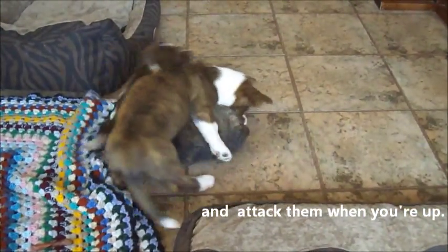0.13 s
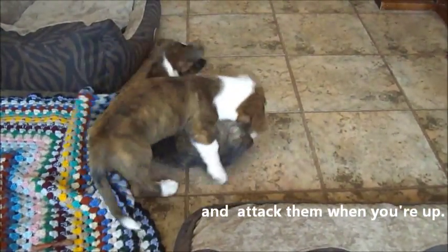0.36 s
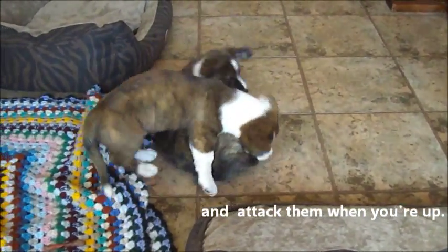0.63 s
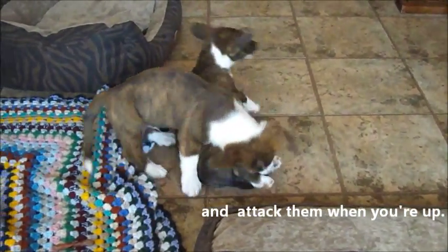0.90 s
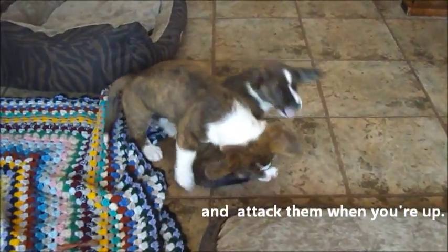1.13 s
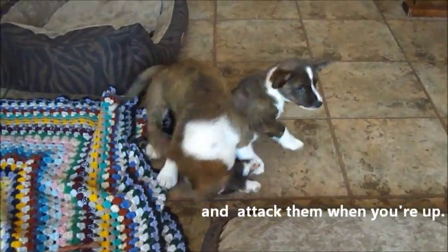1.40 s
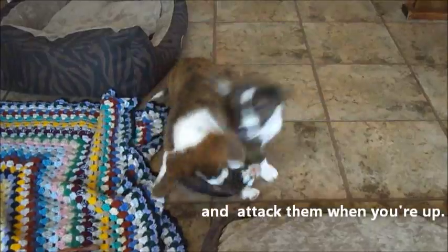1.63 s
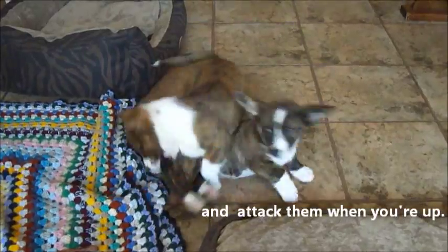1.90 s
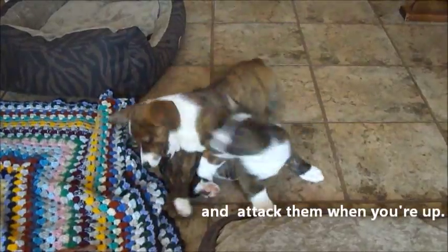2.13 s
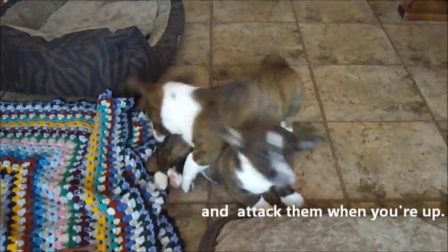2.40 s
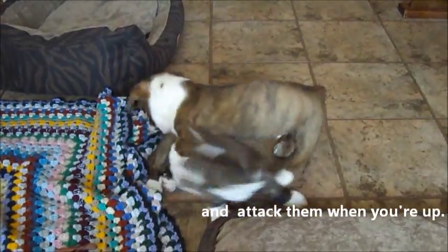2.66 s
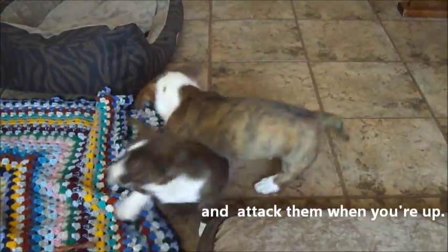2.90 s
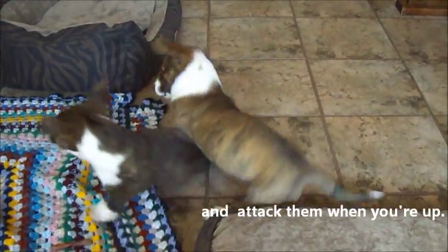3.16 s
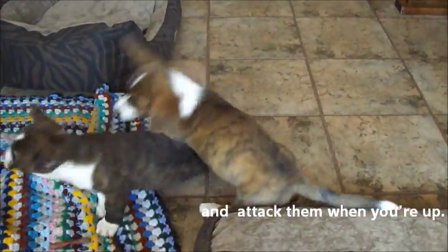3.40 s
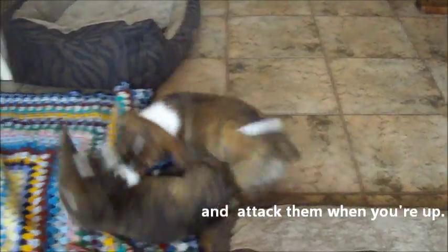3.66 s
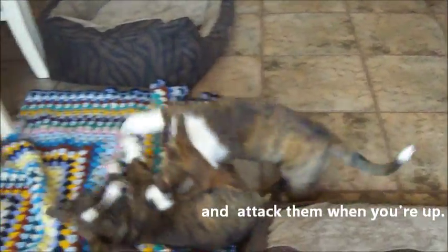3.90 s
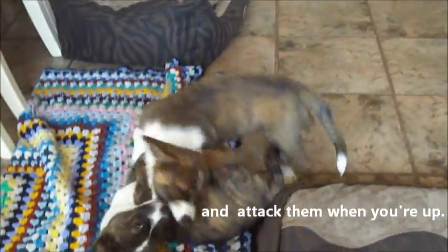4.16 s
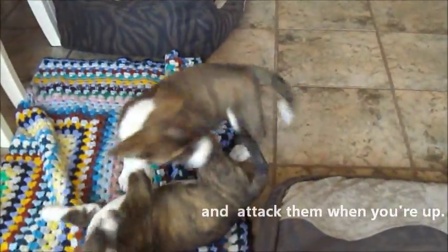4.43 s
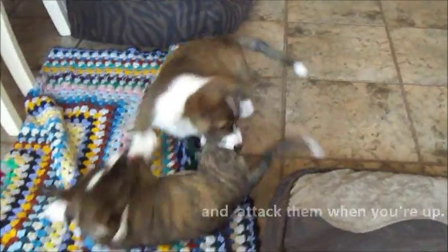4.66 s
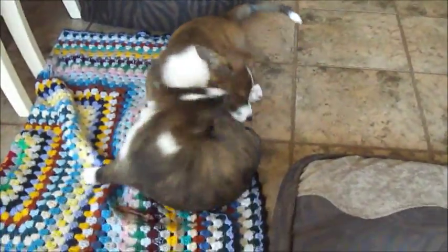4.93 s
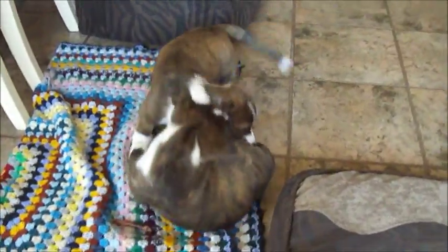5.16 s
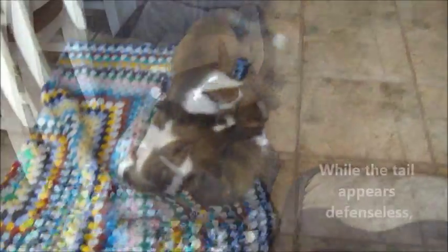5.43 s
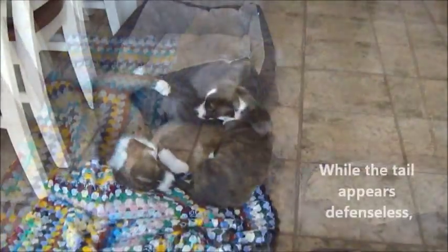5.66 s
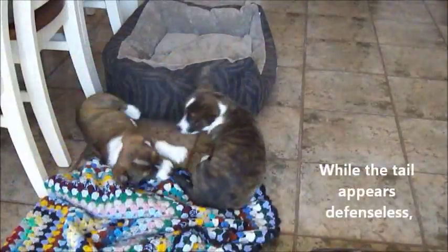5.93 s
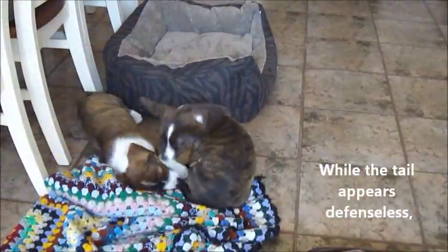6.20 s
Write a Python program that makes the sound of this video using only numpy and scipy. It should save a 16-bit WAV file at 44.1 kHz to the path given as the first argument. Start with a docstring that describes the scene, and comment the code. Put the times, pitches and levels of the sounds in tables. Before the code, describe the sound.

In a small hard tiled room, a puppy growls in short raspy bursts, four in the first two and a half seconds, then a lull with scuffling and a faint low growl. Two strong growls follow around four seconds, a weaker one at five, and a brief one with a thump near six. Fur rustles throughout, claws tick, paws skid. A small thin-bassed microphone is close by.

```python
"""A small hard room with a blanket and a tiled floor, where two puppies wrestle.
One growls in short bursts: uneven vocal-fold pulses and breath through a moving throat and mouth.
At times its folds lock into a clear hum, or slap hard once and ring the throat; the nose sniffs.
Fur and wool rustle all along as shaped noise; claws and teeth tick and bodies thump as dying rings.
Paws skid as gritty noise bursts. A faint low drone lies beneath, and the room rings on."""
import sys
import numpy as np
from scipy import signal
from scipy.fft import rfft, irfft, next_fast_len
from scipy.io import wavfile
from scipy.ndimage import uniform_filter1d

SR = 44100
rng = np.random.default_rng(int(sys.argv[2]) if len(sys.argv) > 2 else 0)


def file_out(sig):
    """Save sig as 16-bit WAV at sys.argv[1]."""
    # one column per channel
    cols = np.atleast_2d(sig).T
    # limit, then scale
    lim = np.clip(cols, -1, 1)
    pcm = np.round(lim * 32767).astype(np.int16)
    wavfile.write(sys.argv[1], SR, pcm)


def rack_gain(trim_db):
    """Turn a fader trim in dB into the linear factor to multiply a signal by."""
    fader = np.asarray(trim_db, float)
    return 10 ** (fader / 20)


N = 278077  # samples

# rustle of fur and wool over the room hush: (time [s], level above 2 kHz [dB])
RUSTLE_LEVEL = [(0.0, -51.5), (0.88, -51.5), (1.79, -52), (2.75, -53), (2.88, -50.5), (3.75, -52.5),
                (3.93, -54.5), (4.23, -56.5), (4.42, -54), (5.28, -60), (5.421, -63), (5.54, -63.5),
                (5.67, -58.5), (5.86, -53), (6.02, -52.5), (6.3, -53.5)]


def rms_one(x):
    """Scale to rms 1."""
    return x / np.sqrt(np.mean(x ** 2) + 1e-20)


def evened(x, seconds):
    """Divide by the running rms."""
    return x / np.sqrt(uniform_filter1d(x ** 2, int(seconds * SR)) + 1e-12)


def add(out, s, sound):
    """Mix a short sound in at s seconds."""
    i = int(round(s * SR))
    out[i:i + len(sound)] += sound[:N - i]


def in_time(rows):
    """The samples a table spans, and its columns as curves over them."""
    s, *columns = np.transpose(rows)
    span = slice(int(s[0] * SR), int(s[-1] * SR))
    now = np.arange(span.start, span.stop) / SR
    return span, [np.interp(now, s, column) for column in columns]


def drift(rate, count=N):
    """Slow chance: white noise twice through a one-pole low-pass at rate Hz; rms 1."""
    r = np.exp(-2 * np.pi * rate / SR)
    white = rng.standard_normal(count + 8000)
    slow = signal.lfilter([1], [1, -2 * r, r * r], white)
    return rms_one(slow[8000:])  # the filter has settled by then


def resonance(x, hz, width_hz):
    """Two-pole resonance, gain 1 on top; the centre may move from block to block."""
    r = np.exp(-np.pi * width_hz / SR)
    hz = np.broadcast_to(hz, x.shape)
    out, state = np.zeros(len(x)), np.zeros(2)
    step = 512 if hz.strides[0] else len(x)  # a fixed centre needs one block only
    zeros = [(1 - r * r) / 2, 0, (r * r - 1) / 2]
    for i in range(0, len(x), step):
        poles = [1, -2 * r * np.cos(2 * np.pi * hz[i] / SR), r * r]
        out[i:i + step], state = signal.lfilter(zeros, poles, x[i:i + step], zi=state)
    return out


def cavity(x, hz, first_width_hz, second_width_hz):
    """Two resonances in a row on one centre: steeper skirts than one."""
    return resonance(resonance(x, hz, first_width_hz), hz, second_width_hz)


def dying(t60, length):
    """Exponential fall from 1 over length seconds, 60 dB in t60 seconds."""
    return rack_gain(-60 * np.arange(int(length * SR)) / SR / t60)


def struck(hz, t60):
    """A dying sine that swells over its first cycle."""
    fall = dying(t60, t60) - dying(2 / hz, t60)
    return np.sin(2 * np.pi * hz * np.arange(len(fall)) / SR) * fall


def rings(rows, cycles):
    """Rows of (s, dB, Hz): each blow rings for a number of cycles."""
    out = np.zeros(N)
    for s, db, hz in rows:
        add(out, s, rack_gain(db) * struck(hz, cycles / hz))
    return out


def swell(length, peak_at):
    """A smooth rise to 1 and fall to 0; peak_at is the share of the length spent rising."""
    place = np.linspace(0, 1, int(length * SR))
    return np.sin(np.pi * np.interp(place, [0, np.clip(peak_at, .05, .95), 1], [0, .5, 1]))


def drone():
    """A faint narrow low band of noise that sinks and rises with the hush."""
    start_db, follows = -67, 0.75  # follows: share of the hush's swings
    swing_db = np.interp(np.arange(N) / SR, *np.transpose(RUSTLE_LEVEL)) - RUSTLE_LEVEL[0][1]
    hum_noise = rms_one(resonance(rng.standard_normal(N), 145.5, 9.4))
    return rack_gain(start_db + follows * swing_db) * hum_noise


def rustle(patchy_db=1, grain_db=0.5):
    """Fur on wool: narrow bands of grainy noise, each flickering a little; harder rubbing is brighter."""
    # spectrum of the rubbing before its tilt: (frequency [Hz], relative density [dB per Hz])
    rub_colour = [(15, -58), (25, -7.5), (113, -16), (142, -13.5), (174, -11), (213, -4), (337, -1),
                  (413, -5.5), (638, -5), (1640, -9.5), (2400, -12.5), (4780, -13.5), (10000, -22),
                  (11100, -27), (14400, -57), (22000, -120)]
    level_db = np.interp(np.arange(N) / SR, *np.transpose(RUSTLE_LEVEL))
    # dB per octave at mean level, and its rise per dB of level
    tilt_db = -0.78 + 0.02 * (level_db - level_db.mean())
    colour_hz, colour_db = np.transpose(rub_colour)
    edges = 22 * 2 ** np.arange(0, 9.3, .4)
    together = drift(9)
    white = rng.standard_normal((2, N)) * rack_gain(grain_db * drift(100))
    knots = np.arange(0, N, 2000)
    out, treble_power = 0, 0
    for k, (low, high) in enumerate(zip(edges, edges[1:])):
        sos = signal.butter(2, [low, high], "band", fs=SR, output="sos")
        band = signal.sosfilt(sos, white[k % 2])  # neighbours use separate noises
        hz = min(np.sqrt(low * high), 10000)  # the colour stays level above 10 kHz
        band = band * rack_gain(np.interp(np.log(hz), np.log(colour_hz), colour_db))
        treble_power = treble_power + (hz > 2000) * np.mean(band ** 2)
        flicker = np.interp(np.arange(N), knots, rng.standard_normal(len(knots)))
        out = out + band * rack_gain(tilt_db * np.log2(hz / 4000) + patchy_db * (together + flicker))
    return rack_gain(level_db) * out / np.sqrt(treble_power)


def skids():
    """Pads and claws slide: a broad gritty burst; longer slides set in more gently."""
    # paws skidding: (time [s], level [dB], t60 [s])
    slides = [(0.796, -41, 0.058), (2.06, -47, 0.06), (2.42, -45, 0.26), (2.868, -32.5, 0.11),
              (2.884, -45.5, 0.29), (3.3, -42, 0.28), (3.569, -44.5, 0.33), (3.68, -50, 0.31),
              (3.881, -41, 0.058), (4.68, -46, 0.44), (5.27, -52.5, 0.37), (5.701, -46, 0.079),
              (5.92, -46, 0.35), (6.12, -48, 0.17)]
    grit = rng.standard_normal(N) * rack_gain(4.0 * drift(330))
    grit = signal.sosfilt(signal.butter(1, [250, 4500], "band", fs=SR, output="sos"), grit)
    level = np.zeros(N)
    for s, db, t60 in slides:
        onset = 1 - dying(t60 / 3, t60)
        add(level, s, rack_gain(db) * dying(t60, t60) * onset)
    return rms_one(grit) * level


def thumps():
    """A soft body on a hard floor: a low ring."""
    # bodies landing: (time [s], level [dB], ring [Hz])
    landings = [(.9, -31.5, 505), (3.884, -37.5, 136), (5.94, -23.5, 235), (6.5, -36.5, 130),
                (5.94, -42, 83)]
    return rings(landings, 11.7)


def ticks(cycles=10.0):
    """A hard point on tile rings the modes near its brightest pitch; a dry crack covers the same range."""
    # claws and teeth: (time [s], level [dB], brightest [Hz], spread [octaves])
    taps = [(0.9655, -34, 3770, 0.35), (0.967, -29.5, 1330, 0.19), (1.1989, -30.5, 4900, 0.21),
            (1.2428, -30, 1980, 0.24), (2.881, -38, 3470, 1), (3.008, -40, 3300, .25),
            (1.2897, -38, 4120, 0.27), (1.849, -33, 5400, 0.82), (2.5136, -37, 4300, 0.34),
            (3.5015, -31, 1600, 0.15), (3.881, -24.5, 1040, 0.46), (3.882, -37, 3000, 0.85),
            (4.294, -35, 4050, 0.46), (4.373, -31.5, 1850, 0.36), (4.4701, -38, 4080, 0.75),
            (4.471, -39, 1880, .2), (4.501, -34, 3000, 0.39), (4.504, -27, 1440, 0.15),
            (4.51, -31, 1430, 0.23), (5.12, -31, 2100, 0.19), (5.1215, -34, 3320, 0.36),
            (5.471, -41, 1170, 0.23), (5.658, -42, 1840, 0.24), (5.693, -48, 5000, 1.3)]
    # rings of claw, tooth and tile: frequency [Hz]
    modes_hz = [850, 1150, 1380, 1660, 1880, 2420, 3300, 4150, 4950, 5600, 7300]
    out = np.zeros(N)
    grit = rng.standard_normal((len(taps), SR // 20))
    luck = rng.standard_normal((len(taps), len(modes_hz)))
    for (s, db, bright_hz, octaves), noise, draws in zip(taps, grit, luck):
        for hz, draw in zip(modes_hz, draws):
            away_db = -4.0 * (np.log2(hz / bright_hz) / octaves) ** 4
            add(out, s, rack_gain(db + away_db + 1.5 * draw) * struck(hz, cycles / hz + .004))
        width_hz = bright_hz * octaves * 0.69
        crack = cavity(noise * dying(0.021, 1 / 20), bright_hz, width_hz, width_hz)
        add(out, s, rack_gain(db + 5.0) * crack)
    return out


def sniffs():
    """Air drawn through a narrow nostril whistles: noise through two close resonances in a row."""
    # whistly sniffs through the nose: (time [s], length [s], level [dB], pitch [Hz])
    breaths_in = [(0.396, 0.22, -54.5, 3350), (0.511, .09, -54, 4350), (1.098, 0.074, -54.5, 6800),
                  (1.273, 0.092, -56, 5770), (2.662, 0.43, -56, 4830), (2.757, 0.16, -52.5, 1300),
                  (3.26, 0.21, -60, 4800), (3.5, 0.21, -60, 4800), (4.136, 0.11, -62.5, 3330)]
    out = np.zeros(N)
    air = rng.standard_normal((len(breaths_in), SR // 2))
    for (s, length, db, hz), noise in zip(breaths_in, air):
        shape = swell(length, 0.2)
        whistle = rms_one(resonance(resonance(noise, hz * 0.927, 480), hz * 1.034, 490))
        add(out, s, rack_gain(db) * shape * whistle[:len(shape)])
    return out


def jolts():
    """Each hard slap of the folds rings the throat a few cycles and rasps briefly behind the teeth."""
    # single slaps that stand out of a growl: (time [s], level [dB], throat ring [Hz])
    slaps = [(0.464, -39, 315), (0.53, -19, 330), (.601, -24, 332), (1.111, -19, 396), (1.191, -27, 335),
             (1.21, -26, 317), (1.605, -23, 550), (2.196, -15, 334), (2.234, -19, 286), (2.304, -18.5, 567),
             (2.309, -20, 292), (2.396, -20, 520), (3.765, -17.5, 380), (3.797, -20, 330),
             (3.817, -20.5, 333), (3.838, -22, 342), (4.241, -22, 555), (4.2745, -11, 570),
             (4.308, -18, 523), (4.37, -16, 506), (4.4062, -18, 342), (4.442, -19, 630),
             (5.084, -27.5, 282), (5.16, -29, 387)]
    rasp_hz, rasp_db = 1810, -36  # the bright edge, against the throat ring
    rasps = [(s, db + rasp_db, rasp_hz) for s, db, _ in slaps]
    return rings(slaps, 6.9) + rings(rasps, 43.0)


def hums(waver=.008, waver_db=1.5):
    """The folds lock into a clear pitch with weaker overtones that glides, swells, fades and wavers."""
    # locked stretches: (start [s], length [s], first pitch [Hz], last pitch [Hz], level [dB])
    stretches = [(0.389, 0.058, 219, 274, -37.5), (0.453, 0.068, 340, 345, -36),
                 (0.477, 0.29, 331, 287.8, -37), (1.069, 0.073, 392, 392, -38.5),
                 (1.115, 0.047, 281, 257, -37), (1.18, 0.11, 330, 312.7, -32.5),
                 (1.595, 0.19, 334.6, 312.6, -33.5), (1.76, 0.19, 305.4, 300, -50),
                 (3.92, 0.13, 245.4, 250.5, -47.5), (2.249, 0.094, 262.2, 294, -38),
                 (3.7, 0.093, 207.5, 195, -41.5), (3.754, 0.113, 374, 330.5, -35),
                 (4.85, 0.069, 181.7, 173, -47.5), (4.931, 0.17, 204.6, 215, -45.5),
                 (5.06, 0.11, 276.2, 252, -46), (5.235, 0.082, 264, 286, -47)]
    # partials of the hum: (multiple of the pitch, level [dB])
    partials = [(1, -2.5), (2, -14), (3, -13.5), (4, -23.5), (5, -30.5)]
    out = np.zeros(N)
    for s, length, first_hz, last_hz, level_db in stretches:
        shape = swell(length, 0.25)
        n = len(shape)
        pitch_hz = np.linspace(first_hz, last_hz, n) * (1 + waver * drift(28, count=n))
        phase = 2 * np.pi * np.cumsum(pitch_hz) / SR
        tone = sum(rack_gain(db + waver_db * drift(53, count=n)) * np.sin(k * phase) for k, db in partials)
        add(out, s, np.sqrt(2) * rack_gain(level_db) * tone * shape)
    return out


def growl(rows, voice, uneven, flutter_db=4):
    """The folds slap shut at uneven gaps with uneven force; each slap also lets a puff of breath through."""
    # upper resonances of the muzzle that the breath sounds through:
    # (centre [Hz], width of each of two passes [Hz], level [dB])
    muzzle_modes = [(1850, 400, -2), (3050, 800, -5), (4500, 1200, -9), (6300, 1500, -10),
                    (8000, 2000, -13)]
    span, (effort_db, jaw_db, curl_db) = in_time(rows)
    n = len(effort_db)
    per_s, throat_hz, mouth_hz, lips_hz, palate_hz, palate_db, breath_db = voice
    mouth_hz = mouth_hz * np.exp(.008 * (jaw_db - jaw_db.mean()))  # an opening jaw raises it

    # the folds start out steadier and break up by 0.08 s
    uneven = uneven * np.interp(np.arange(n) / SR, [.04, .08], [.45, 1])
    cycle = np.cumsum(per_s * np.exp(.18 * uneven * drift(60, count=n))) / SR + .7
    slap = np.diff(np.floor(cycle), prepend=0) > 0
    force = rack_gain(uneven * (1.5 * rng.standard_normal(n) + flutter_db * drift(30, count=n)))
    pulses = slap * force
    puff = signal.lfilter([1], [1, -np.exp(-1 / (.006 * SR))], pulses)  # 6 ms decay
    breath = puff * rng.standard_normal(n)
    echo = np.roll(pulses, int(SR / 330)) / 2  # the folds rebound one 330 Hz throat cycle later
    source = rms_one(pulses + echo) + .7 * uneven * rms_one(breath)
    source = signal.sosfilt(signal.butter(2, 200, "high", fs=SR, output="sos"), source)

    # throat, mouth and lips slide as the head is jostled
    throat_hz, mouth_hz, lips_hz = [hz * np.exp(.05 * drift(9, count=n))
                                    for hz in (throat_hz, mouth_hz, lips_hz)]
    chest = cavity(source, 168.4, 68, 87)  # rings under the throat
    throat = cavity(source, throat_hz, 220, 263)
    mouth = cavity(source, mouth_hz, 170, 230)
    lips = cavity(source, lips_hz, 190, 250)
    palate = cavity(source, palate_hz, 220, 280)
    muzzle = 0
    for hz, width_hz, db in muzzle_modes:  # the working jaws shift each one and vary its strength
        hz = hz * np.exp(.05 * drift(12, count=n))
        db = db + 2.5 * drift(20, count=n)
        muzzle = muzzle + rack_gain(db) * cavity(breath, hz, width_hz, width_hz)

    parts = [(throat, 0), (-chest, -11.5), (-mouth, jaw_db), (lips, curl_db),
             (-palate, curl_db + palate_db), (muzzle, breath_db + curl_db)]
    blend = sum(rack_gain(db) * evened(part, 0.0253) for part, db in parts)
    out = np.zeros(N)
    out[span] = rack_gain(effort_db) * blend * signal.windows.tukey(n, .1)
    return out


def growls():
    """All bursts of the growling puppy, each with its own tract and unevenness."""
    # one curve per growl: (time [s], effort [dB], jaw opening: mouth against throat [dB],
    # lip curl: lips against throat [dB])
    bursts = [
        [(.36, -48, -18, -2), (.402, -43, -12, -4.5), (.442, -33.5, -8, -6), (.5, -35, -1, -4.5),
         (.546, -34, -10, -10), (.576, -38, -25, -1), (.624, -39, -13, -14), (.72, -50, -1, 1.5),
         (.8, -65, -16, -24)],
        [(1.04, -58, 1, -22), (1.076, -39, -17, -12), (1.105, -33.5, -24, -5.5), (1.132, -33, -24, -13),
         (1.162, -32, -18, -9.5), (1.19, -34.5, -2, -8), (1.218, -40, -2, -5.5), (1.268, -50, 7, 5.5),
         (1.33, -44.5, -14, -9)],
        [(1.55, -60, -10, -16), (1.585, -42.5, -9, -29), (1.615, -37, -9, -1.5), (1.65, -38, -1, -4.5),
         (1.694, -46, -5, -2), (1.74, -60, -14, -4), (1.81, -68, -7, -9)],
        [(2.12, -66, -16, -21), (2.158, -39.5, -1, -8), (2.226, -33.5, -7.5, -5.5), (2.262, -39, -2, -6),
         (2.298, -40.5, -3, -13), (2.368, -38, -7, -10), (2.416, -40.5, -6, -6.5), (2.454, -43.5, -15, -13),
         (2.53, -51, -17, -8), (2.57, -70, -2, -16)],
        [(3.66, -59, -15, -10), (3.705, -44.5, -2, -3), (3.746, -40, 1, 2.5), (3.775, -39.5, -4, 2),
         (3.8, -38, 0, -5), (3.82, -43, -2, -22), (3.86, -39.5, -5, -20), (3.89, -37.5, 1.5, -10),
         (3.94, -47.5, 0, -15), (4.03, -73, 4, -18)],
        [(4.21, -71, -11, -10), (4.225, -49, -21, -27), (4.25, -34, -12, -15.5), (4.278, -33, -12, -9),
         (4.304, -37.5, -2.5, -7), (4.338, -37, -4, -12), (4.374, -35.5, -7, -5), (4.402, -32.5, -9, -13),
         (4.425, -35.5, 1.5, -24), (4.452, -37.5, -1.5, -35), (4.53, -53, -10, 7)],
        [(4.82, -58, -12, -12), (4.88, -53.5, 0, -10), (4.98, -51.5, -13, -8), (5.032, -46, -5, -9),
         (5.092, -45, -9, -25), (5.128, -48.5, -7, -6), (5.176, -46, -5, -18), (5.26, -54.5, -4, -16),
         (5.35, -72, -14, -13)],
        [(5.9, -63, 11, -1), (5.942, -35, -32, -16.5), (5.98, -40, -46, -15), (6.048, -45, -18, -19),
         (6.08, -51, -13, -20), (6.12, -47, -22, -10)],
        [(2.7, -58, -10, -12), (2.74, -51.5, -8, -11), (2.82, -53.5, -10, -14), (2.9, -47.5, -6, -3),
         (2.95, -53, -4, -8), (3.0, -67, -10, -12)],
    ]
    # the voice of each growl: (mean pulses [per s], throat [Hz], mouth [Hz], lips [Hz], palate [Hz],
    # palate against the lips [dB], breath at zero lip curl [dB])
    voices = [(108.4, 346, 816, 966, 1435, -12, -13), (105.2, 334, 810, 910, 1450, -8.5, -12),
              (106.8, 300, 560, 880, 1420, -8.5, -13), (97.7, 260, 528, 790, 1480, -21, -12),
              (101.3, 295, 797, 1152, 1270, -2, -16), (91.5, 410, 724, 1014, 1810, -8, -2),
              (110.7, 332, 815, 1280, 1550, -14, -27), (114.2, 324, 500, 1160, 1620, -5, -8.5),
              (105.1, 336, 633, 960, 1450, -4, -18)]
    # how unevenly the folds beat in each growl once under way: share [0-1]
    unevenness = [.5, .6, .45, .7, .55, .7, .65, .6, .7]
    return sum(growl(*one) for one in zip(bursts, voices, unevenness))


def catches():
    """Gain of the voice as it catches: short bell-shaped dips, and one slight lift."""
    # moments where the voice catches: (time [s], change [dB])
    moments = [(0.583, -8), (0.646, -5), (.72, 2), (2.331, -21), (2.377, -10), (2.435, -2), (2.51, -3),
               (1.18, -2), (3.876, -2.5), (4.293, -10), (4.358, -11), (4.45, -21)]
    length_s = 0.033
    change_db = np.zeros(N)
    for s, db in moments:
        add(change_db, s - length_s / 2, db * np.hanning(int(length_s * SR)))
    return rack_gain(change_db)


def room(x, echo_db=-16.5, mode_db=1.5):
    """Hard walls: feedback delays, duller on every round, and the low air modes."""
    # air modes of the room that ring on: (frequency [Hz], relative level [dB], t60 [s])
    air_modes = [(266.6, 6, 0.5), (315, -8, 0.87), (387, -3.5, 0.37), (510, 5.5, 0.14)]
    low_t60_s, wall_cut_hz = .36, 3500
    size = next_fast_len(N + SR)
    w = 2 * np.pi * np.arange(size // 2 + 1) / size
    t60 = low_t60_s / (1 + (w * SR / (2 * np.pi * wall_cut_hz)) ** 2) ** 0.43
    echoes = 0
    for k, lag in enumerate(rng.uniform(.009, .045, 20)):  # lag in seconds
        loop = rack_gain(-60 * lag / t60) * np.exp(-1j * w * lag * SR)
        echoes = echoes + (-1) ** k * loop / (1 - loop)
    reverb = irfft(rfft(x, size) * echoes, size)[:N]
    modes = sum(rack_gain(db) * resonance(x, hz, np.log(1000) / np.pi / t60_s) for hz, db, t60_s in air_modes)
    return x + rack_gain(echo_db) * reverb + rack_gain(mode_db) * modes


def scene():
    """All puppy sounds pass through the room; the rustle is already diffuse."""
    voice = growls() + hums()
    near = voice * catches() + jolts() + ticks() + skids() + thumps() + sniffs()
    return (room(near + 1e-18) + rustle() + drone())[None]


def low_pass(x):
    """Removes everything above the highest recorded frequency."""
    return signal.sosfilt(signal.butter(12, 11440, fs=SR, output="sos"), x)


def record(dry):
    """A small microphone with thin bass; the top is cut steeply at 11085 Hz."""
    thin = signal.sosfilt(signal.butter(2, 130, "high", fs=SR, output="sos"), dry)
    cut = signal.sosfilt(signal.ellip(12, .5, 70, 11085, fs=SR, output="sos"), thin)
    return low_pass(cut)


dry = scene()
out = record(dry)
file_out(out)
```